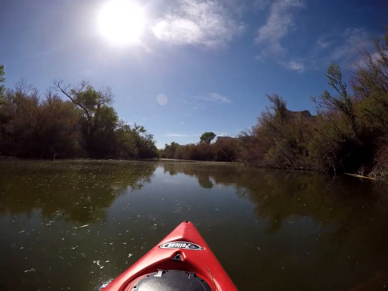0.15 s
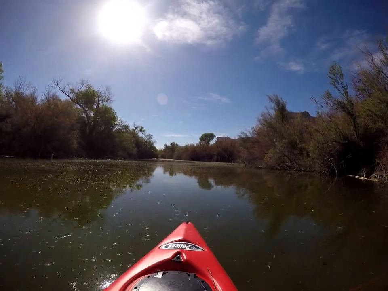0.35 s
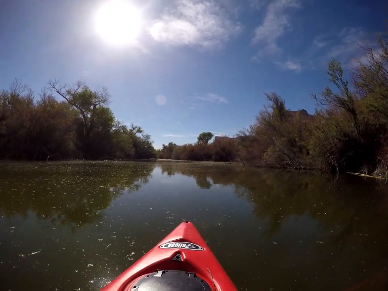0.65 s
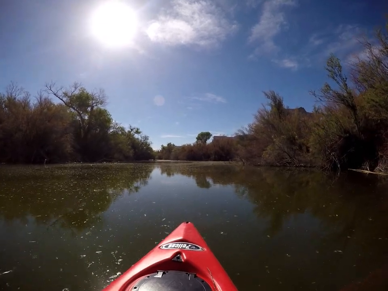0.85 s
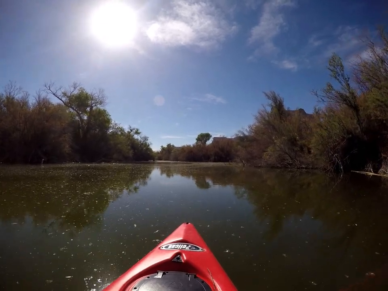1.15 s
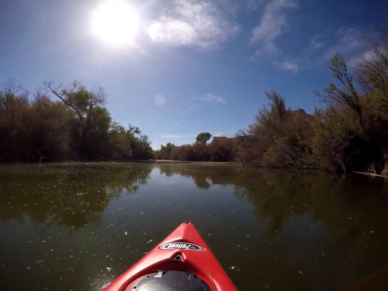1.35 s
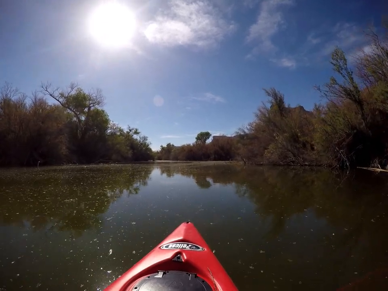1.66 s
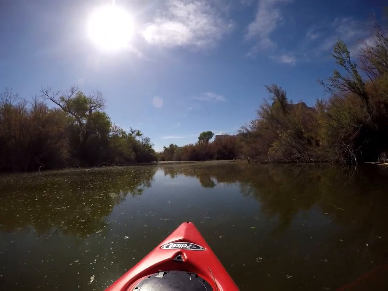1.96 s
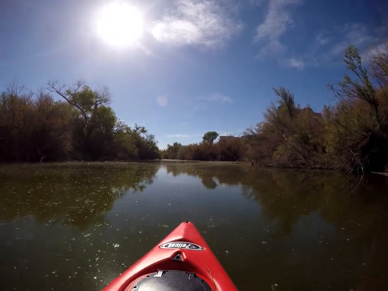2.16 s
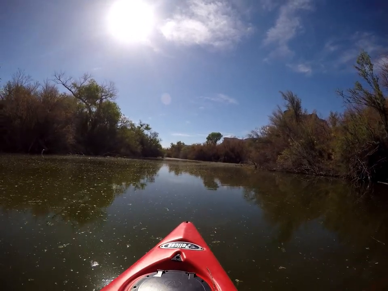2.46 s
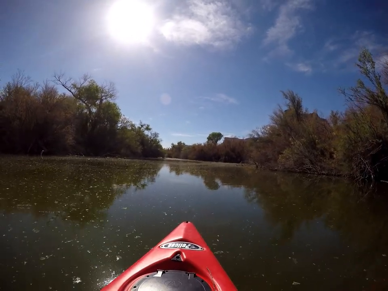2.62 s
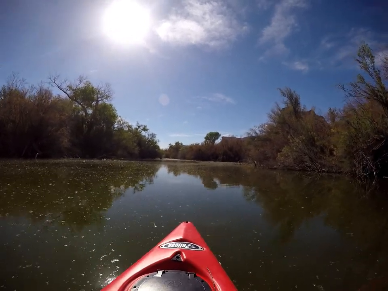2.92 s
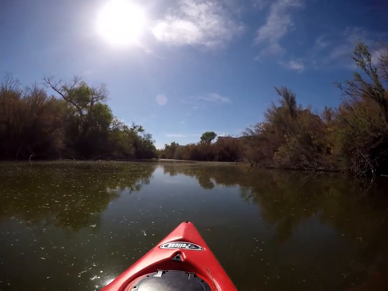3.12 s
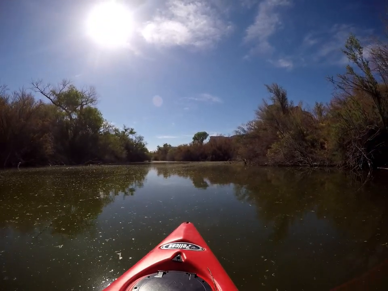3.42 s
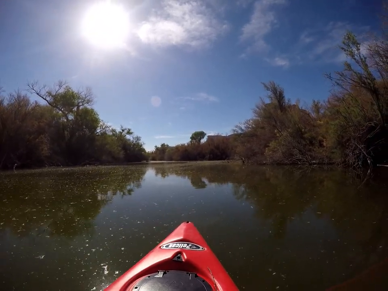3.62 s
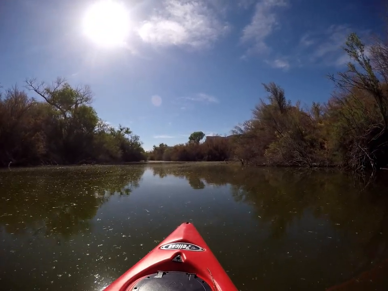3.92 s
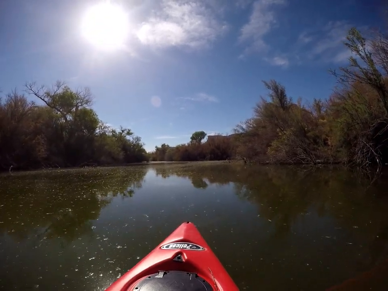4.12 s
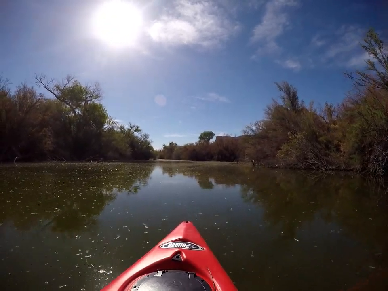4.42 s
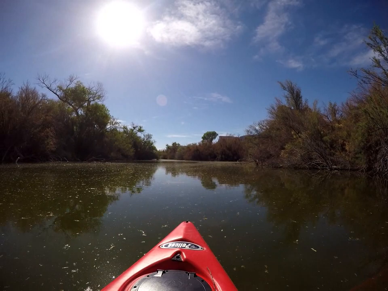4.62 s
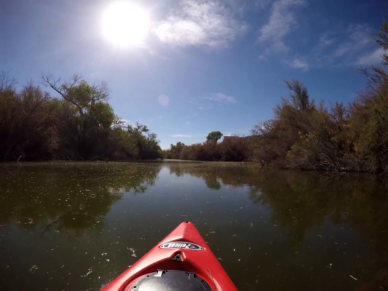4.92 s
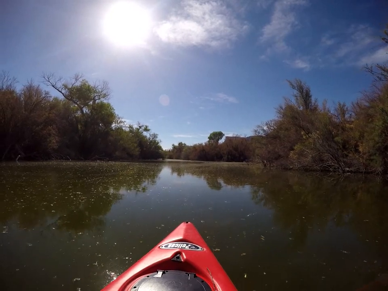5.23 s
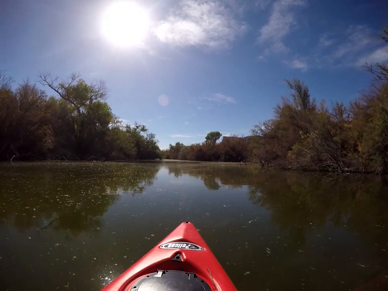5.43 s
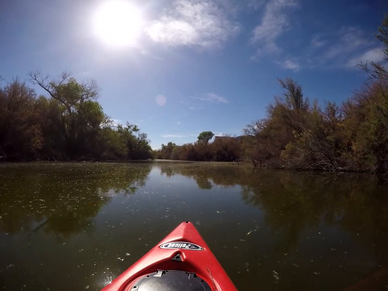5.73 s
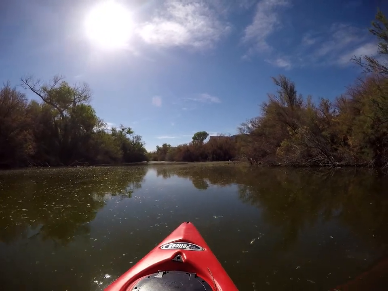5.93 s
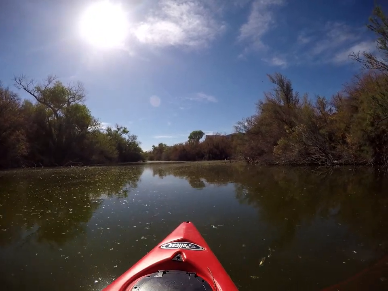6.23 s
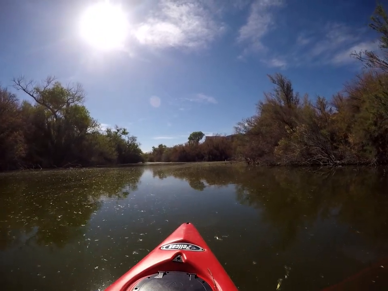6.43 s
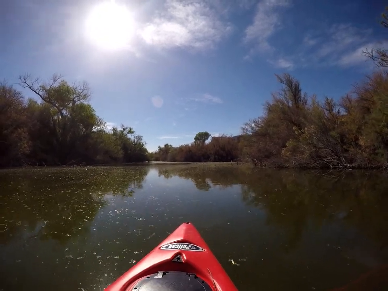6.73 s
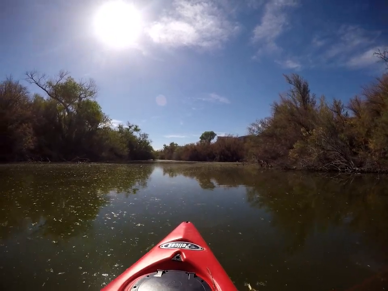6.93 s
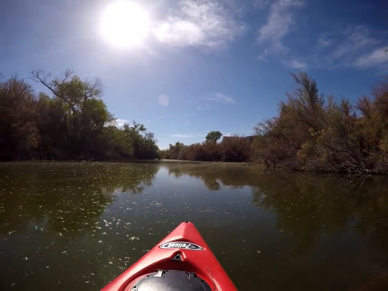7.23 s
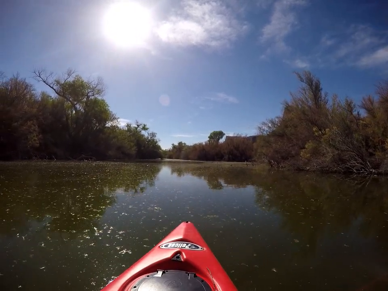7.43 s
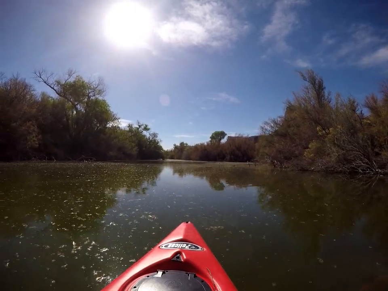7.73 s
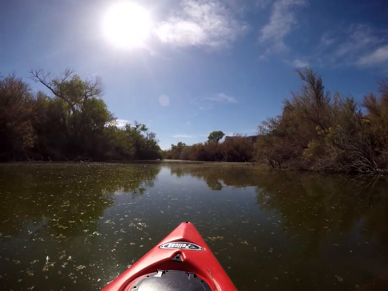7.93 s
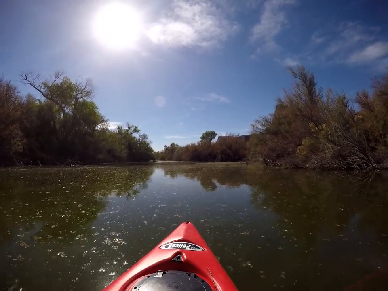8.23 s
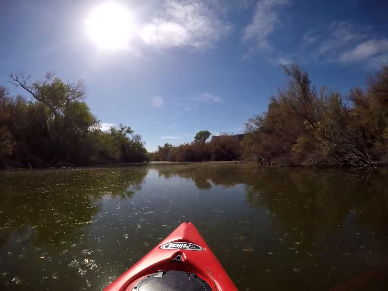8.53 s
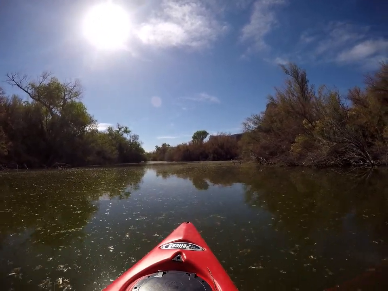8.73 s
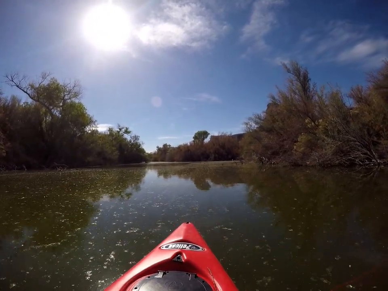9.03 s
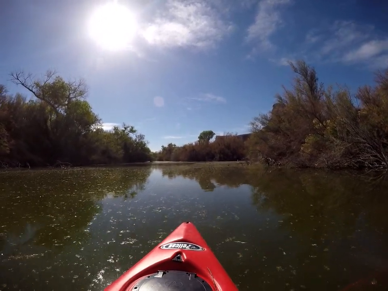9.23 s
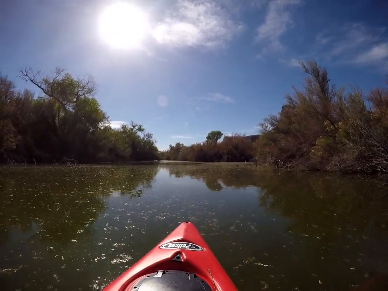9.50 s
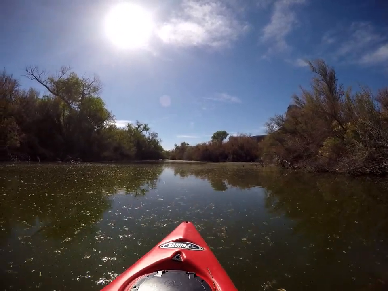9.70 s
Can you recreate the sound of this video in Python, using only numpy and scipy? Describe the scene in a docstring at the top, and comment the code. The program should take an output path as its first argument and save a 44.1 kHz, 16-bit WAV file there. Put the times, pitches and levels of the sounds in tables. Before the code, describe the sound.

Close on a plastic kayak deck on a calm river, a busy cluster of hollow knocks, clacks and gritty rubs opens over heavy low rumble, easing after the first second. A few bumps follow around one and two seconds. Then bright drips, bubbly plops and soft paddle swirls come and go over faint air hiss, with a thin high electronic whine and fluttering chatter from the camera.

```python
"""Bumps knock on the hollow hull of a plastic kayak on a calm river, ringing its modes as decaying sines.
Rubs set off the same modes, taps swell into single notes and the flexing hull rumbles as coloured noise.
The paddle sheds drips, each a ringing bubble and a noise splat; its wake is bubble swarms over a soft wash.
Under it lie a faint hiss of air and the thin whine, pips and chatter of the electronics in a deck camera."""
import sys
import numpy as np
from scipy import signal
from scipy.fft import rfft, irfft, next_fast_len
from scipy.io import wavfile
from scipy.ndimage import uniform_filter1d

SR = 44100
rng = np.random.default_rng(int(sys.argv[2]) if len(sys.argv) > 2 else 0)


def to_wav(sig):
    """Store sig (one row per channel, or 1-D mono) as 16-bit WAV at the path in sys.argv[1].

    Samples outside -1..1 are clipped; the rate is SR.
    """
    pcm = np.clip(np.atleast_2d(sig), -1, 1) * 32767
    pcm = np.round(pcm).astype(np.int16)
    wavfile.write(sys.argv[1], SR, pcm.T)  # frames by channels


N = 434826
TIME = np.arange(N) / SR


def from_db(db):
    """Decibels to gain."""
    return 10 ** (np.asarray(db) / 20)


def rms_one(x):
    """Scale to rms 1."""
    return x / np.sqrt(np.mean(x ** 2) + 1e-20)


def level_curve(rows):
    """Read a table of times and levels sample by sample, with straight lines between points."""
    times, levels = np.transpose(rows)
    return np.interp(TIME, times, levels)


def at_hz(points, hz):
    """Read a spectrum in dB on a log-frequency axis."""
    knots, db = np.transpose(points)
    return np.interp(np.log(hz + 1e-9), np.log(knots), db)


def drift(points_per_s):
    """Random wandering, rms 1, in straight lines between random points."""
    knots = rng.standard_normal(int(points_per_s * N / SR) + 2)
    return rms_one(np.interp(TIME * points_per_s, np.arange(len(knots)), knots))


def noise(spectrum):
    """Steady noise of a given colour, rms 1."""
    size = next_fast_len(N)
    hz = np.arange(size // 2 + 1) * SR / size
    coloured = rfft(rng.standard_normal(size)) * from_db(at_hz(spectrum, hz))
    return rms_one(irfft(coloured, size)[:N])


def band(x, low_hz, high_hz, order=2):
    """Causal band-pass."""
    edges = np.clip([low_hz, max(high_hz, low_hz + 10)], 10, 0.45 * SR)
    sos = signal.butter(order, edges, "band", fs=SR, output="sos")
    return signal.sosfilt(sos, x)


def fade(t, t60_s):
    """Free decay: 60 dB in t60_s."""
    return np.exp(-np.log(1000) * t / max(t60_s, 1e-4))


def add(out, start_s, sound):
    """Mix a sound into out from a given time."""
    start = max(int(start_s * SR), 0)
    out[start:start + len(sound)] += sound[:max(N - start, 0)]


# the hull's modes: pitch_hz, relative level_db, t60_s
HULL_MODES = [(80, -8, 0.16), (179.9, 1.5, 0.17), (358.3, -5.5, 0.13), (406, -3.5, 0.092),
              (482.6, 2, 0.067), (616, -2.5, 0.043), (716.4, -2.5, 0.12), (824.6, 0.5, 0.11),
              (1106, -3.5, 0.056), (1273, 1, 0.017), (1482, 2.5, 0.024), (1508, -1.5, .025),
              (1744, -3, 0.033), (2177, -10, 0.036), (3070, -23, 0.048), (3510, -18, 0.032)]


def hull_ring(t, weight, scatter_db):
    """The hull's answer to one contact: decaying modes, weighted by the contact's spectrum."""
    ring = 0
    for k, (hz, db, t60_s) in enumerate(HULL_MODES):
        strength = from_db(db + at_hz(weight, hz) + scatter_db * rng.uniform(-0.95, 1))
        sign = (-1) ** k  # neighbouring modes start in opposite directions
        ring = ring + sign * strength * np.sin(2 * np.pi * hz * t) * fade(t, t60_s)
    return ring


# bumps on the hull, levels relative: start_s, boom_db, body_db, clack_db
KNOCKS = [(0.0706, -46.5, -47, -52), (0.221, -44, -42.5, -54.5), (0.3208, -54, -45, -55),
          (0.351, -54, -43.5, -39), (0.386, -43, -43, -41), (0.3955, -39.5, -37.5, -43),
          (0.423, -47.5, -43, -37.5), (0.4868, -47, -40.5, -45), (0.6285, -54, -53.5, -59),
          (0.738, -56.5, -56.5, -59), (0.808, -52.5, -48.5, -54), (0.893, -57, -55, -60),
          (1.3516, -48, -47.5, -51.5), (1.386, -57, -57, -63), (1.465, -61, -58.5, -60),
          (1.567, -54, -55.5, -63), (2.053, -60.5, -56.5, -74), (2.3279, -41.5, -42, -52.5),
          (3.956, -47, -49, -57), (4.263, -58.5, -53.5, -66), (4.513, -55.5, -56.5, -76),
          (5.046, -53, -57.5, -64), (7.096, -50, -54, -61), (9.527, -56, -63.5, -74)]


def knocks(boom_gain_db=9.0, body_gain_db=3.5, clack_gain_db=7.0, crack_gain_db=0.0, crack_t60_s=0.018):
    """Each bump rings the hull's modes; heavy ones boom, hard ones clack and crunch."""
    out, t = np.zeros(N), TIME[:SR // 3]
    for start_s, boom_db, body_db, clack_db in KNOCKS:
        weight = [(183, boom_db + boom_gain_db), (330, body_db + body_gain_db),
                  (850, body_db + body_gain_db), (1300, clack_db + clack_gain_db)]
        ring = hull_ring(t, weight, scatter_db=0.37)
        crack = rms_one(band(rng.standard_normal(len(t)), 340, 1460)) * fade(t, crack_t60_s)
        add(out, start_s, ring + from_db(clack_db + crack_gain_db) * crack)
    return out


# gritty rubs on the hull: start_s, end_s, rms level_db
RUBS = [(0.118, 0.152, -49.5), (0.335, 0.427, -46), (0.465, 0.517, -50.5), (0.746, 0.835, -53.5),
        (0.944, 1.046, -63), (1.217, 1.265, -54), (1.345, 1.369, -52), (2.1, 2.134, -57.5),
        (2.355, 2.423, -66)]


def rubs(slips_per_s=500, low_db=-3.5, high_db=-2.0):
    """Rubbing is a dense run of tiny slips, each setting off the hull's modes."""
    out = np.zeros(N)
    ring = hull_ring(TIME[:SR // 10], [(200, low_db), (800, 0), (3000, high_db)], scatter_db=1)
    for start_s, end_s, db in RUBS:
        size = max(int((end_s - start_s) * SR), 100)
        chance, force = rng.random((2, size))
        slips = (chance < slips_per_s / SR) * (2 * force - 1)
        slips = slips * signal.windows.tukey(size, 0.5)
        sound = signal.fftconvolve(slips, ring)
        rub_rms = np.sqrt(np.mean(sound[:size] ** 2) + 1e-20)  # leaves out the tail
        add(out, start_s, from_db(db) * sound / rub_rms)
    return out


# hollow taps: start_s, level_db before attack and decay, pitch_hz, t60_s, attack_s
TAPS = [(0.118, -18, 835, 0.062, 0.0033), (0.118, -30, 416, 0.062, .0035),
        (0.396, -20, 833, 0.037, 0.00037), (1.236, -35, 428, 0.085, 0.0038), (2.108, -44, 744, 0.053, .005),
        (4.625, -40, 825, 0.055, 0.0025)]


def taps():
    """Soft contacts that swell into a single hollow note."""
    out, t = np.zeros(N), TIME[:SR // 4]
    for start_s, db, hz, t60_s, attack_s in TAPS:
        attack = (1 - np.exp(-t / attack_s)) ** 2
        add(out, start_s, from_db(db) * np.sin(2 * np.pi * hz * t) * fade(t, t60_s) * attack)
    return out


def heave_shape(peak_s, rise_s, t60_s):
    """A smooth rise to height 1 at a time, then a free decay."""
    rise = np.exp(-(np.minimum(TIME - peak_s, 0) / rise_s) ** 2)
    return rise * fade(np.clip(TIME - peak_s, 0, 2 * t60_s), t60_s)


HEAVE_RISE_S, HEAVE_T60_S = 0.031, 0.61
# a bump also shakes the hull, in proportion to its boom
SHAKE_DB, SHAKE_RISE_S, SHAKE_T60_S = 8.5, 0.016, 0.68
# low unrest under heaves and bumps: time_s, relative level_db
UNREST = [(0.0, -43.5), (0.66, -43.5), (0.99, -45), (3.29, -57), (3.95, -53.5), (8.27, -58.5), (9.5, -58),
          (9.86, -59)]
# the boat rocks and the hull flexes: peak_s, relative level_db
HEAVES = [(0.356, -18.5), (0.515, -29.5), (0.791, -29.5), (1.37, -29.5), (1.69, -41.5), (2.39, -37.5),
          (3.6, -45.5), (4.31, -44), (4.54, -42), (6.44, -42.5), (7.12, -46), (8.42, -46.5), (9.38, -47)]


def flexing(unrest_gain_db=4.0):
    """How hard the hull flexes, in dB: the powers of heaves and bumps add to a low unrest."""
    power = from_db(level_curve(UNREST) + unrest_gain_db) ** 2
    for peak_s, db in HEAVES:
        power = power + (from_db(db) * heave_shape(peak_s, HEAVE_RISE_S, HEAVE_T60_S)) ** 2
    for start_s, boom_db, _, _ in KNOCKS:
        shape = heave_shape(start_s + SHAKE_RISE_S, SHAKE_RISE_S, SHAKE_T60_S)
        power = power + (from_db(boom_db + SHAKE_DB) * shape) ** 2
    return 10 * np.log10(power)


# pass band of the deck panel: low_hz, high_hz
PANEL_BAND = (68, 92)
# colour of the flexing: frequency_hz, relative level_db per Hz
FLEX_COLOUR = [(20, 1.5), (36, 2.5), (60, -8), (80, -5), (105, -18), (170, -22.5), (260, -33), (500, -34.5),
               (1000, -61)]


def rumble(level_db=-3.5, evenness=0.48, panel_db=-4.0, hard_db=-35.0):
    """The hull's flexing reaches the camera through its mount; hard flexing also wakes a deck panel."""
    flex_db = flexing()
    panel = rms_one(band(rng.standard_normal(N), *PANEL_BAND))
    # below hard_db the panel dies away faster than the rest
    panel_gain = from_db(panel_db + np.minimum(flex_db - hard_db, 0))
    shake = rms_one(band(noise(FLEX_COLOUR), 17.0, 1100)) + panel * panel_gain
    # evenness 0 keeps the noise's own swells, 1 levels them out
    swells = np.sqrt(uniform_filter1d(shake ** 2, size=SR // 14) + 1e-12)
    return from_db(flex_db + level_db) * rms_one(shake / swells ** evenness)


def bubble(hz, t60_s, rise=0.05, swell_cycles=4.5):
    """A trapped air bubble rings and rises in pitch as it nears the surface; height 1."""
    t = TIME[:int(t60_s * SR) + SR // 500]
    pitch_hz = hz * (1 + rise * np.minimum(t / t60_s, 1))
    attack = (1 - np.exp(-t * hz / swell_cycles)) ** 2
    ring = np.sin(2 * np.pi * np.cumsum(pitch_hz) / SR) * fade(t, t60_s) * attack
    return ring / (np.abs(ring).max() + 1e-12)


# fainter drops: how often, middle level and pitch, the largest swing of each, and the splat's width
STRAY_PER_S, STRAY_DB, STRAY_SWING_DB = 2.2, -50.5, 3
STRAY_HZ, STRAY_SWING_OCTAVES, STRAY_SPLAT_OCTAVES = 3040, 0.53, 0.55


def stray_drops():
    """Faint drops at random moments, as rows like those of the clear ones."""
    rows = []
    for when, size, pitch in rng.random((int(STRAY_PER_S * N / SR), 3)):
        db = STRAY_DB + STRAY_SWING_DB * (2 * size - 1)
        hz = STRAY_HZ * 2 ** (STRAY_SWING_OCTAVES * (2 * pitch - 1))
        rows.append((when * N / SR, db, hz, STRAY_SPLAT_OCTAVES))
    return rows


# the clearest drops off the blade: start_s, relative level_db, pitch_hz, nominal splat width_octaves
DRIPS = [(1.5029, -46.5, 2960, .7), (1.7089, -41.5, 3900, 0.55), (1.7568, -45, 3410, 0.73),
         (2.9903, -43.5, 3740, .6), (3.2202, -37, 2250, 0.77), (3.2279, -35, 2950, 0.26),
         (3.2302, -32.5, 2710, 1), (4.096, -34.5, 4350, .2), (4.4691, -46, 1760, 1.5),
         (4.4969, -40, 1480, 0.28), (4.573, -49, 1970, 1.1), (4.6708, -43, 3060, .25),
         (4.6942, -46, 3120, .25), (4.7752, -43.5, 3220, .55), (5.4413, -41.5, 3780, 0.43),
         (5.981, -37, 3500, 0.58), (6.0901, -44.5, 6300, .6), (6.2586, -40.5, 3950, 0.51),
         (7.2248, -45, 3630, .3), (7.8035, -44, 3300, 1.1), (7.9322, -41.5, 3570, 0.45),
         (7.9841, -46, 2800, 1.8), (8.2049, -42.5, 2720, .85), (8.2768, -45, 2930, .2),
         (8.4607, -41, 3100, 0.59), (8.5428, -45.5, 3060, 0.31), (8.8979, -40.5, 3870, 0.23),
         (9.0638, -38, 3400, 0.91), (9.1214, -35.5, 2310, 2.1), (9.7359, -29.5, 4000, 0.35)]


def drips(ring_db=-1.5, ring_t60_s=0.0062, splat_db=-8.5, splat_t60_s=0.02):
    """A clean drop leaves a ringing bubble; a broad one is mostly splat."""
    out, t = np.zeros(N), TIME[:SR // 20]
    for start_s, db, hz, octaves in list(DRIPS) + stray_drops():
        clean = 1 / (1 + 2 * octaves ** 2)  # near 1 for a narrow drop
        reach = 2 ** (abs(octaves) / 2 + 0.16)
        splat = rms_one(band(rng.standard_normal(len(t)), hz / reach, hz * reach, order=3))
        splat = splat * fade(t, splat_t60_s)
        add(out, start_s, from_db(db + splat_db) * (2 - clean) * splat)
        add(out, start_s, from_db(db + ring_db) * clean * bubble(hz, ring_t60_s))
    return out


# larger bubbles that ring out in the wake: start_s, peak level_db, pitch_hz
PLOPS = [(3.54, -52.5, 1750), (4.4965, -51, 1500), (4.575, -56, 1910), (4.6683, -45, 3126),
         (5.913, -49.5, 1630), (6.556, -53, 2230), (8.207, -55, 2400), (8.458, -45, 2940),
         (8.623, -53.5, 1960), (9.066, -50, 2110), (9.632, -54, 2080)]


def plops(cycles=48):
    """Each bubble rings for about the same number of cycles, so big ones last longer."""
    out = np.zeros(N)
    for start_s, db, hz in PLOPS:
        add(out, start_s, from_db(db) * bubble(hz, cycles / hz))
    return out


# trickle along the moving hull, under the swirls: time_s, relative level_db
TRICKLE = [(0, -68.5), (2.7, -73), (5.6, -74), (7.0, -69.5), (9.86, -73.5)]
# the blade and its run-off stir the water, levels relative: middle_s, length_s, gurgle_db, spatter_db
SWIRLS = [(0.82, 0.17, -61, -61), (0.994, 0.12, -63, -64), (1.232, 0.11, -79, -58.5), (1.41, .25, -76, -81),
          (1.743, 0.18, -69, -67), (2.297, 0.25, -67, -61), (3.437, 0.25, -65.5, -59),
          (3.56, .12, -65, -70), (4.626, 0.27, -63.5, -67), (5.416, 0.14, -81, -61.5),
          (5.936, 0.17, -64.5, -59), (6.216, 0.59, -75, -68), (6.587, 0.089, -61, -68),
          (7.513, 0.88, -69.5, -76), (7.982, 0.11, -75, -60), (8.213, 0.13, -64, -72),
          (8.503, 0.56, -71, -62.5), (9.105, 0.15, -66, -73), (9.332, 0.16, -68, -74),
          (9.692, 0.27, -66.5, -67)]


def stirring(trickle_gurgle_db=-2.0, trickle_spatter_db=1.0, waver_db=2.0):
    """Gurgle and spatter in dB: a wavering trickle, and swirls that swell and die away."""
    trickle_db = level_curve(TRICKLE) + waver_db * drift(7)
    gurgle_power = from_db(trickle_db + trickle_gurgle_db) ** 2
    spatter_power = from_db(trickle_db + trickle_spatter_db) ** 2
    for middle_s, length_s, gurgle_db, spatter_db in SWIRLS:
        arch = signal.windows.hann(int(length_s * SR))
        add(gurgle_power, middle_s - length_s / 2, (from_db(gurgle_db) * arch) ** 2)
        add(spatter_power, middle_s - length_s / 2, (from_db(spatter_db) * arch) ** 2)
    return 10 * np.log10(gurgle_power), 10 * np.log10(spatter_power)


def froth(level_db, low_hz, high_hz, per_s, cycles, spread_db):
    """A swarm of small bubbles of random loudness and pitch, as loud as the water is stirred."""
    out = np.zeros(N)
    for when, size, pitch, damping in rng.random((int(per_s * N / SR), 4)):
        hz = low_hz * (high_hz / low_hz) ** pitch
        gain = from_db(spread_db * min(-np.log(1 - size), 3))  # many quiet bubbles, few loud ones
        add(out, when * N / SR, gain * bubble(hz, cycles * (0.5 + damping) / hz))
    return rms_one(out) * from_db(level_db)


def water(gurgle_gain_db=-1.5, spatter_gain_db=-4.5, wash_gain_db=-3.0):
    """The blade's wake: larger bubbles gurgle, fine ones spatter over a soft wash."""
    gurgle_db, spatter_db = stirring()
    large = froth(gurgle_db + gurgle_gain_db, 1500, 2300, per_s=240, cycles=36, spread_db=3.5)
    fine = froth(spatter_db + spatter_gain_db, 2850, 3900, per_s=280, cycles=42, spread_db=4.0)
    wash = rms_one(band(rng.standard_normal(N), 1070, 4900))
    wash = wash * from_db((gurgle_db + spatter_db) / 2 + wash_gain_db)
    return large + fine + wash


# colour of the air: frequency_hz, relative level_db per Hz
AIR_COLOUR = [(30, 1), (100, -2), (200, -7), (400, -12.5), (800, -15), (1400, -19), (2100, -21.5),
              (2600, -21.5), (3300, -23), (4600, -20.5), (6400, -23.5), (8000, -27), (11000, -29.5),
              (15000, -33)]


def air(level_db=-59.0, waver_db=1.0):
    """Light air over the river: a soft, nearly even hiss."""
    return from_db(level_db + waver_db * drift(2.883)) * noise(AIR_COLOUR)


FRAME_HZ = 23.976  # pictures per second
# harmonics of the electronic whine, from the first up: rms level_db
WHINE = [-71.5, -82, -83]


def whine(whine_hz=5034.7, slip_turns=0.32, pip_db=-66.5, pip_hz=8560, pip_s=0.0074):
    """A thin tone whose phase slips once a picture, and one pip for every picture the camera takes."""
    slip = slip_turns / 2 * signal.sawtooth(2 * np.pi * FRAME_HZ * TIME, 0.85)
    turns = whine_hz * TIME - slip + 0.03 * drift(8)
    tones = sum(from_db(db) * np.sin(2 * np.pi * k * turns) for k, db in enumerate(WHINE, 1))
    from_frame_s = np.abs((TIME * FRAME_HZ + 0.5) % 1 - 0.5) / FRAME_HZ
    gate = np.clip((pip_s / 2 - from_frame_s) * 1000 + 0.5, 0, 1)  # edges of 1 ms
    pips = from_db(pip_db) * gate * np.sin(2 * np.pi * pip_hz * TIME + 2 * drift(24))
    return np.sqrt(2) * (tones + pips)  # turns rms levels into sine peaks


BURST_GAP_S, BURST_JITTER_S = 0.092, 0.0498  # mean time between bursts, and its largest swing
# spells of electronic chatter: start_s, end_s
SPELLS = [(1.58, 5.46), (7.427, 9.86)]


def burst_times():
    """Within a spell, bursts follow each other at uneven gaps."""
    times = []
    for start_s, end_s in SPELLS:
        gaps = BURST_GAP_S + BURST_JITTER_S * rng.uniform(-1, 1, size=80)
        run = start_s + np.cumsum(gaps) - gaps[0]
        times.extend(run[run < end_s])
    return times


BURST_S = 0.028
# colour of the chatter: frequency_hz, relative level_db per Hz
BUZZ_COLOUR = [(2000, -28), (3000, -10.5), (4200, -6.5), (5200, -10.5), (6400, 0), (7600, -18),
               (8800, -10.5), (9700, -22.5), (11000, -14.5), (12000, -21), (13400, -10)]
# a brief high fizz before each spell: start_s, length_s, pitch_hz, rms level_db
FIZZES = [(1.453, 0.1, 10640, -70.5), (7.291, 0.11, 10900, -68.5)]


def buzz(level_db=-60.5, flutter_hz=190, flutter=0.55):
    """The electronics chatter in uneven, fluttering noise bursts, each spell led in by a fizz."""
    gate, fizzes = np.zeros(N), np.zeros(N)
    for middle_s in burst_times():
        add(gate, middle_s - BURST_S / 2, signal.windows.tukey(int(BURST_S * SR), 0.2))
    for start_s, length_s, hz, db in FIZZES:
        fizz = rms_one(band(rng.standard_normal(int(length_s * SR)), hz - 220, hz + 220))
        add(fizzes, start_s, from_db(db) * fizz)
    gate *= 1 + flutter * np.sin(2 * np.pi * flutter_hz * TIME + 2 * drift(40))
    hiss = band(noise(BUZZ_COLOUR), 2000, 13900, order=8)
    return fizzes + from_db(level_db) * gate * hiss


def scene():
    """Hull, water, air and electronics at one microphone."""
    hull = knocks() + rubs() + taps() + rumble()
    river = drips() + plops() + water()
    electronics = whine() + buzz()
    return (hull + river + air() + electronics)[None]


def record(dry, cutoff_hz=15300):
    """The top is cut steeply by an elliptic low-pass."""
    sos = signal.ellip(12, 0.1, 70, cutoff_hz, fs=SR, output="sos")  # order, ripple dB, stop-band dB
    return signal.sosfilt(sos, dry)


dry = scene()
out = record(dry)
to_wav(out)
```